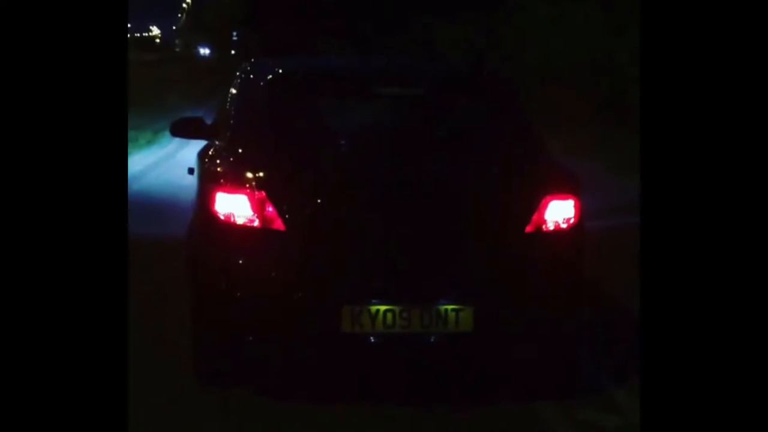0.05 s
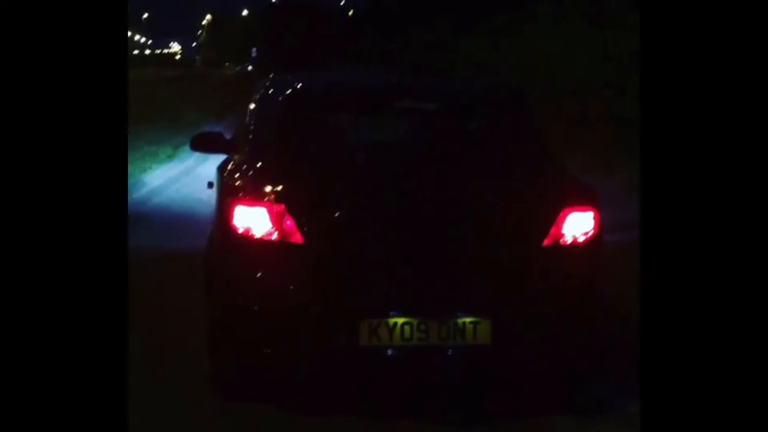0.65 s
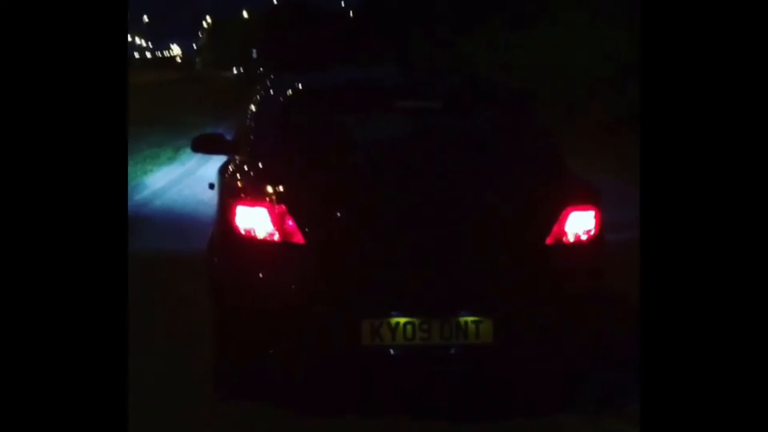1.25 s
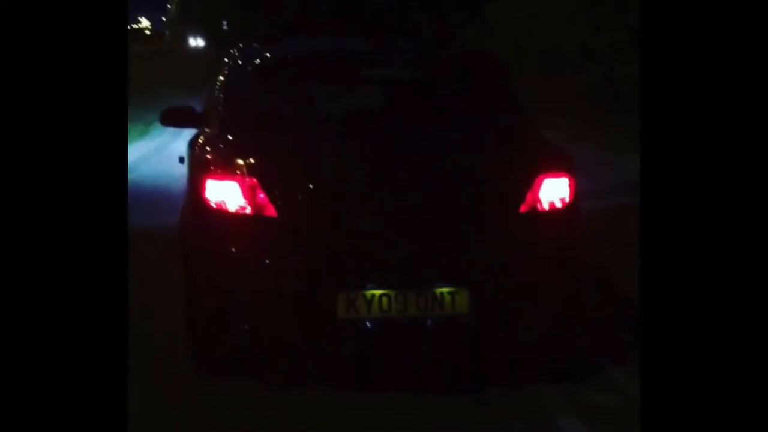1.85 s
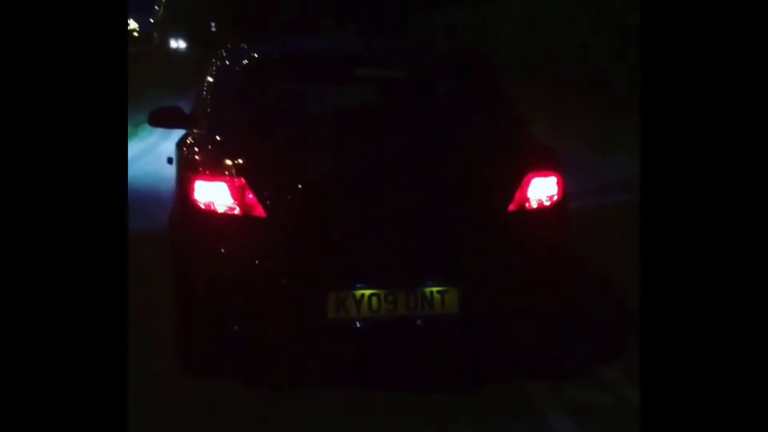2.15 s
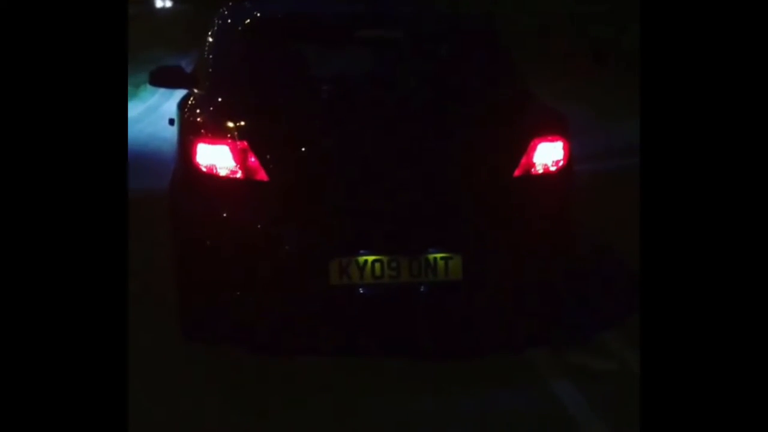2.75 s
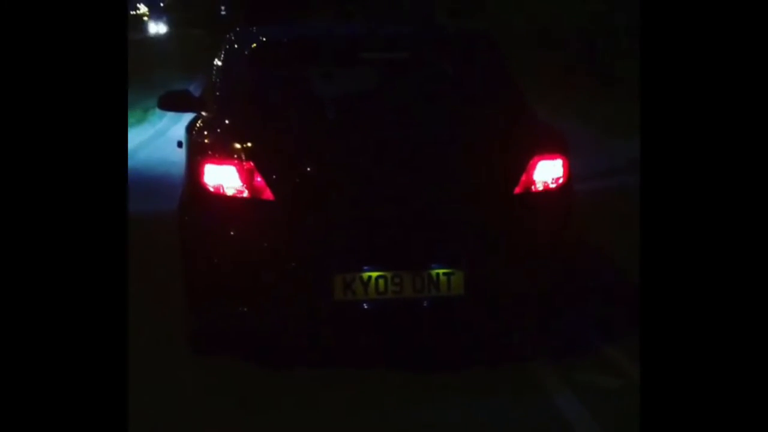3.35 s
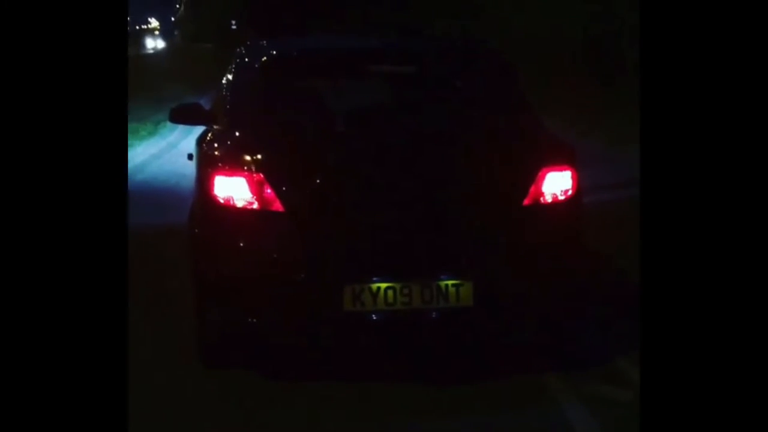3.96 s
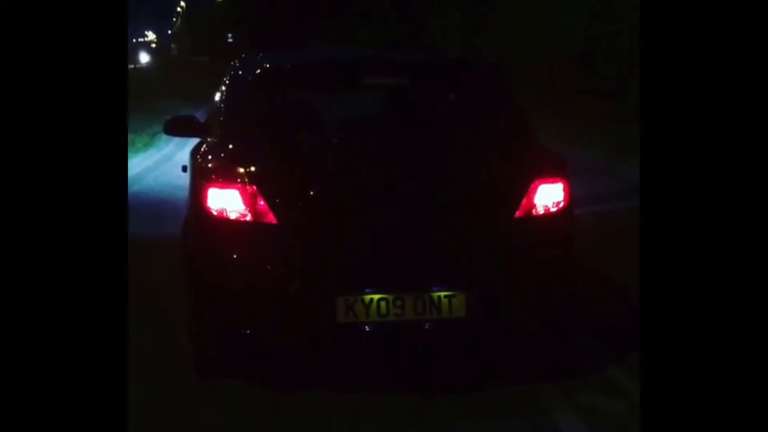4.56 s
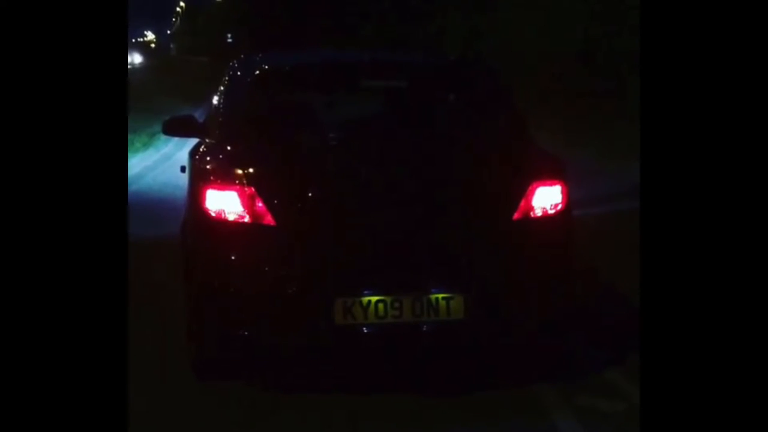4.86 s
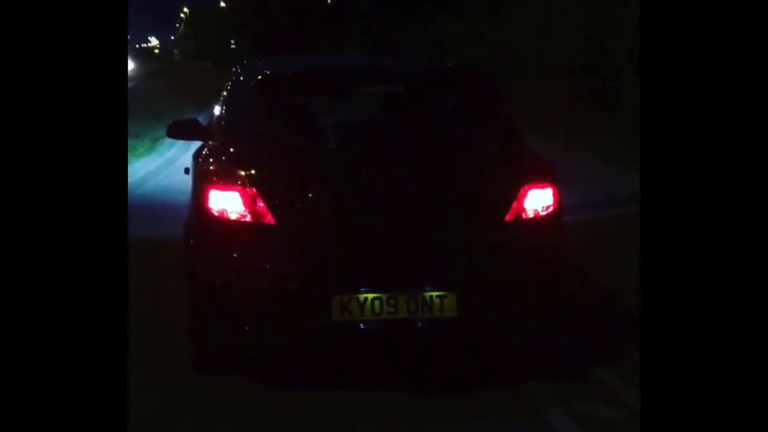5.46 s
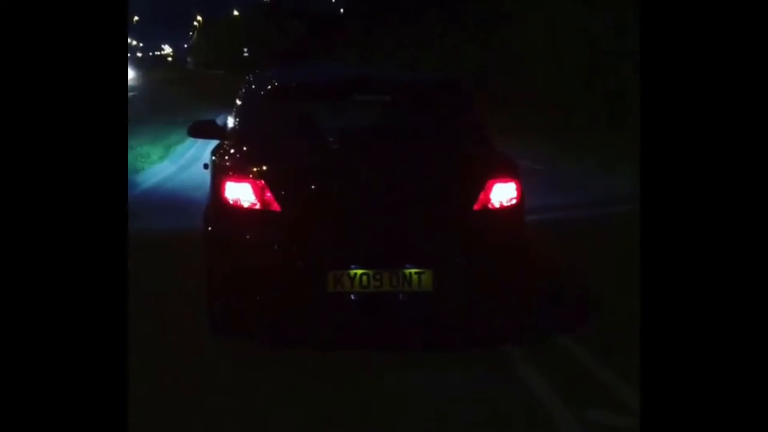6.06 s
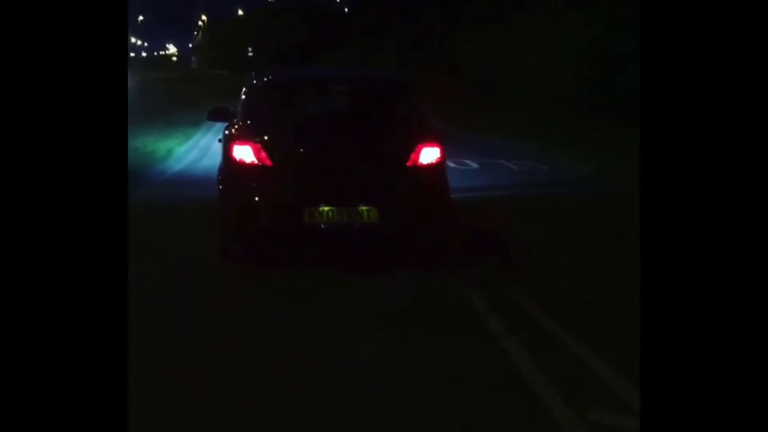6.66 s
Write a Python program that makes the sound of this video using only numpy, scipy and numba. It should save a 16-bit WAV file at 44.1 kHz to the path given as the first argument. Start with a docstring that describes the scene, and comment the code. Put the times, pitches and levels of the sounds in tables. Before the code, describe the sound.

A turbocharged four-cylinder car idles with a low, uneven putter, heard close behind the tailpipe on a quiet road at night. The engine pulls steadily up to high revs, with one faint brake squeak on the way. It then stutters against the rev limiter with thumps, exhaust pops and a thin turbo whistle. The revs dip, the note turns harsher, and a quick run of hard bangs ends it.

```python
"""The exhaust of a turbocharged four-cylinder car, heard just behind the tailpipe on a road at night.
A pulse train, one pulse per firing, drives the resonances of pipe and silencer. The engine idles, pulls
against the brakes (one squeak) and bounces on its rev limiter while the turbo whistles. Each cut drops
the revs and leaves unburnt fuel in the pipe, which pops as firing resumes. Boost steepens the waves and
hardens the note; the engine bogs as the car moves off, and it ends in hard bangs."""
import sys
import numpy as np
from scipy import signal
from scipy.fft import rfft, irfft
from scipy.io import wavfile
from scipy.ndimage import uniform_filter1d
from numba import njit

SR = 44100
rng = np.random.default_rng(int(sys.argv[2]) if len(sys.argv) > 2 else 0)


def to_wav(sig):
    """Store sig (one row per channel, or 1-D mono) as 16-bit WAV at the path in sys.argv[1].

    Samples outside -1..1 are clipped; the rate is SR.
    """
    pcm = np.clip(np.atleast_2d(sig), -1, 1) * 32767
    pcm = np.round(pcm).astype(np.int16)
    wavfile.write(sys.argv[1], SR, pcm.T)  # frames by channels


N = 296352
TIME = np.arange(N) / SR
IDLE_HZ, LIMIT_HZ, LAST_LIMIT_HZ = 26, 144.9, 142.5  # firing rates

# Levels in the tables are relative: each source applies its own further gains.
# engine speed up to the limiter (time [s], firing rate [Hz])
FIRING_RATE = [(0.0, 26.27), (0.29, 26.3), (0.49, 25.86), (0.78, 27.2), (1.04, 29.37), (1.42, 30.09),
               (1.54, 32.34), (1.83, 44.7), (1.99, 51.4), (2.15, 57.7), (2.31, 64.36), (2.83, 82.35),
               (3.25, 96.5), (3.35, 103.4), (3.44, 107.2), (3.55, 122.7), (3.66, 130.5)]
# load on the engine (time [s], boom level [dB], drone level [dB])
LOAD = [(0, -22, -25), (.5, -25, -25), (.88, -20, -22.5), (1.13, -16, -19), (1.4, -27.5, -22.5),
        (1.52, -19, -17.5), (1.68, -20, -24), (1.86, -13.5, -18), (2.0, -18.5, -19.5), (2.17, -13.5, -21),
        (2.44, -15, -15), (2.58, -18.5, -21.5), (2.95, -19, -20.5), (3.17, -19, -18.5), (3.36, -16.5, -21),
        (3.48, -21, -13), (3.58, -25, -26.5), (4.1, -25, -19.5), (5.4, -23, -21), (6.2, -22.5, -18.5),
        (6.6, -24, -24.5)]
# imbalance of the four cylinders, in firing order (level [dB])
CYLINDER_DB = [2.0, -.2, -1.4, -.4]
# irregularity of firing (time [s], lumpiness [0-1], strong-weak lope [dB])
UNEVENNESS = [(1.3, .42, 1), (1.8, .35, .3), (2.5, .3, .2), (2.8, .75, .2), (3.0, .7, .3), (3.15, .25, .5),
              (3.45, .2, .3), (3.75, 1, 0)]
# weak firings (time [s], half width [s], boom change [dB], drone change [dB])
STUMBLES = [(0.609, 0.028, -3.5, -14.5), (0.768, 0.014, -2.5, -7), (1.326, 0.018, -8, -17),
            (3.898, 0.059, -3.5, -5)]
# limiter cuts (start [s], end [s], boom change [dB], drone change [dB], rasp change [dB])
CUTS = [(3.776, 3.867, 4, -3, -1.5), (4.031, 4.11, 2.5, -4, -3), (4.201, 4.273, 2.5, -4, -1.5),
        (4.365, 4.432, 0, -4, -2.5), (4.51, 4.604, 0.5, -3, -1.5), (4.717, 4.791, 0, -3, -4),
        (4.909, 4.99, -2, -2.5, -3), (5.145, 5.206, -0.5, -7.5, -5.5), (5.351, 5.403, -1, -9.5, -7),
        (5.545, 5.609, -2.5, -8.5, -9), (5.756, 5.823, -4.5, -7, -11), (5.938, 6.009, -6, -8.5, -10),
        (6.401, 6.466, -12.5, -30, -4), (6.571, 6.637, -18, -36, -3.5)]
CUT_BOOM_DB, CUT_DRONE_DB, CUT_RASP_DB = np.transpose(CUTS)[2:]
# hardening of the note by boost (time [s], extra rasp [dB])
BOOST = [(1.7, -2), (1.9, -0.5), (2.01, 0), (2.12, 2), (2.24, 1), (2.39, 1.5), (2.58, -2), (3.1, 1),
         (3.44, -0.5), (3.54, -3), (4.8, -2.5), (5.4, 0.5), (6.05, 0.5), (6.2, 8), (6.245, 4), (6.3, 8),
         (6.55, 4)]

# resonances (frequency [Hz], bandwidth [Hz], gain [dB])
PIPE_MODES = [(55.3, 4, 16), (88.2, 15.7, 6), (131.6, 28, 2.5), (183, 17.8, 2)]
SILENCER_MODES = [(190, 31, -27.5), (272.77, 25, 18), (309, 22.3, 17.5), (331.4, 38.6, 14),
                  (411.6, 70, -0.5)]
SILENCER_IDLE_MODES = [(264.5, 17.3, 5), (284.6, 28.1, 0.5), (344.5, 38, -16)]
CHAMBER_MODES = [(312.3, 20, -0.5), (338, 28, -1.5), (370.6, 33, -7), (407.8, 19.6, -5.5)]
TAILPIPE_MODES = [(448, 22, 4), (648.5, 59, 7), (1032, 180, -1), (1116, 146, 2), (1570, 490, -10.5),
                  (2010, 350, -13)]
MOUTH_MODES = [(689, 75, 1.5), (920, 96, -2.5), (948, 37, 1), (1025, 81, -4.5), (1720, 280, -22.5)]
VALVE_GEAR_MODES = [(2700, 140, -1), (3200, 280, -6.5), (3980, 1600, -14.5)]

# the silencer's passband widens as the gas heats up (time [s], upper edge [Hz])
SILENCER_EDGE = [(1.9, 295.5), (2.45, 311.4), (2.9, 343), (3.25, 334), (3.5, 391), (4.5, 395.4), (5.4, 416),
                 (6.6, 468.8)]
# burble of the silencer's upper chambers (time [s], level [dB])
BURBLE_LEVEL = [(3.4, -65), (3.6, -23.5), (4.3, -26.5), (5.4, -19.5), (6.1, -24), (6.7, -20)]
# bark of the pipe mouth under boost (time [s], level [dB])
BARK_LEVEL = [(3.7, -58), (4.9, -44.5), (5.45, -39.5), (5.7, -36), (6.08, -42), (6.2, -31), (6.26, -30.5),
              (6.36, -30), (6.53, -25.5), (6.72, -29.5)]
# snarls as the boost arrives and as the clutch bites (time [s], half width [s], level [dB])
SNARLS = [(3.425, 0.069, -9), (6.201, 0.033, -2.5)]
# their harmonics (multiple of the firing rate [-], level [dB])
SNARL_PARTIALS = [(3, -7.5), (4, -19.5), (6, -20.5), (7, -32), (8, -31.5), (9, -33.5)]
# rushes of gas as the load comes on (time [s], half width [s], extra hiss [dB])
RUSHES = [(2.161, 0.12, 19), (6.32, 0.15, 5.5)]
# fuel exploding in the pipe
# (time [s], bang [dB], sizzle [dB], sizzle time constant [s], crack [dB], crack sweep span [Hz])
POPS = [(4.112, -38, -48.5, 0.0079, -31, 1512), (4.272, -44, -51, 0.0068, -33.5, 1780),
        (4.793, -52, -47, .008, -40, 1980), (4.996, -34.5, -53, 0.0069, -29, 1510),
        (5.208, -31.5, -39.5, 0.0069, -23, 2480), (5.404, -25.5, -41, 0.01, -26, 1880),
        (5.612, -37, -42.5, 0.009, -24, 1520), (5.825, -30.5, -47.5, 0.007, -24.5, 1399),
        (6.009, -34, -50, 0.0077, -31, 2202), (6.383, -23.5, -64, 0.0081, -11, 1870),
        (6.469, -20, -44, 0.014, -8.5, 3500), (6.555, -22.5, -62, 0.0058, -20, 899),
        (6.641, -20.5, -46, 0.016, -11, 1760)]
# compressor whistle before the cuts slow it (time [s], frequency [Hz], level [dB])
TURBO_WHISTLE = [(3.42, 4298, -73), (3.66, 5380, -59), (3.78, 5900, -69), (3.9, 5750, -69),
                 (4.0, 5600, -58.5), (4.2, 6000, -58), (4.38, 6200, -64), (4.5, 6100, -57),
                 (4.6, 6150, -59), (4.72, 6150, -56), (4.87, 6350, -62), (5.1, 6680, -61), (5.2, 7100, -85),
                 (5.34, 7700, -66), (5.52, 8000, -72.5), (5.74, 8720, -63), (5.93, 9050, -69),
                 (6.08, 9050, -68), (6.2, 9250, -68)]
# rattle of the valve gear (time [s], level [dB])
VALVE_GEAR_LEVEL = [(0, -75), (.6, -69), (1.5, -79.5), (1.85, -64.5), (2.35, -60.5), (3.3, -61.5),
                    (4.5, -58.5), (5.6, -65)]
# tones of the belt drive (multiple of the firing rate [-])
BELT_ORDERS = [19.2, 22.6]
# strength of each belt tone (level [dB])
BELT_DB = [-61.5, -60]
# brake squeak (time [s], level [dB])
SQUEAK_LEVEL = [(2.96, -100), (2.975, -59), (3.0, -57), (3.04, -60), (3.09, -64), (3.15, -91)]
# its harmonics (multiple of the fundamental [-], level [dB])
SQUEAK_PARTIALS = [(1, -18), (2, -1), (3, 1.5), (4, -9), (5, -6.5), (6, -17)]

# noise spectra (frequency [Hz], spectral level [dB])
JET_SPECTRUM = [(1500, -5), (2200, 2.5), (2900, -5), (3320, -7), (4000, -9), (5000, -11), (6400, -10),
                (7600, -17), (10000, -18.5), (12500, -22), (15000, -28.5)]
CLATTER_SPECTRUM = [(350, -13), (520, -9.5), (700, -9.5), (1000, 0), (1250, -7.5), (1600, -10.5),
                    (2300, -17), (3000, -31), (4200, -37.5), (9000, -41.5)]
FLAME_SPECTRUM = [(60, -41), (250, -15.5), (500, 1.5), (650, 13), (790, 5.5), (1000, 8), (1350, -6.5),
                  (1900, -5), (3000, -17.5), (5000, -48), (12000, -66)]
SIZZLE_SPECTRUM = [(800, -25.5), (2200, .5), (4000, 0), (6500, -.5), (9000, -6), (15000, -13)]
RUMBLE_SPECTRUM = [(8, -17), (20, -7), (45, -10.5), (100, -9.5), (400, -48), (2000, -75.5)]
RUSTLE_SPECTRUM = [(300, -8.5), (1000, 1), (2300, -7.5), (4000, -28), (9000, -35.5)]
TICK_SPECTRUM = [(1000, -29), (3000, 7), (6500, 0), (10000, -18)]


def firings(phase, scatter, jitter, uneven):
    """Impulse excitation: each opening exhaust valve gives one pulse, irregular in time and strength."""
    count = np.arange(1, int(phase[-1]))
    timing_draw, level_draw = rng.standard_normal((len(count), 2)).T
    firing_s = np.interp(count, phase, TIME)
    times, *columns = np.transpose(UNEVENNESS)
    lumpiness, lope_db = (np.interp(firing_s, times, column) for column in columns)
    imbalance = uneven * np.array(CYLINDER_DB)[count % len(CYLINDER_DB)]
    late_turns = lumpiness * (jitter * timing_draw - .011 * imbalance)
    onsets = np.interp(count + late_turns, phase, np.arange(N)).astype(int)
    db = lumpiness * (imbalance + scatter * level_draw) - uneven * lope_db * (-1.) ** count
    return np.bincount(onsets, undb(db), N)


def pipe_boom(phase, hz, db, deep_loss_db=-11):
    """Standing waves: the pulses drive the long modes of the pipe, and fast flow damps the deepest."""
    pulses = firings(phase, scatter=.8, jitter=.009, uneven=.5)
    softness = np.interp(hz, [27, 31], [.9, 0])  # broad idle pulses favour the deepest mode
    pulses = softness * smooth(pulses, .0025) + (1 - softness) * pulses
    loss = 1 - undb(deep_loss_db * np.interp(hz, [85, 115], [0, 1]))

    def pipe(x):
        modes = ring(x, PIPE_MODES) - loss * ring(x, PIPE_MODES[:1])
        return bandpass(modes, 58, 530, orders=(4, 4))

    # an unfired cylinder sucks instead of blowing, so the pulses invert in a cut
    gate = cut_gate(CUT_BOOM_DB, edge_s=.0011, factor=-1.61) * afterburn(kick=10)
    return pipe(pulses * gate) / running_rms(pipe(pulses)) * undb(db)


def silencer_drone(phase, hz, db, lag_turns=.298):
    """Cavity resonance: the silencer rings near one note, a round putter at idle, brighter at speed."""
    puffs = firings(phase, scatter=3, jitter=.006, uneven=.7)
    putter = bandpass(ring(puffs, SILENCER_IDLE_MODES), 232, 345, orders=(3, 3))
    # under load the silencer answers part of a cycle later than the pipe
    pulses = firings(phase - lag_turns, scatter=2.6, jitter=.018, uneven=1.7)
    drone = butter(ring(pulses, SILENCER_MODES), 237, "high", order=4)
    edge_hz, = curves(SILENCER_EDGE)
    for damping in 2 * np.sin(np.pi * np.array([1, 3, 5, 7]) / 16):  # eighth-order Butterworth
        drone = moving_lowpass(drone, edge_hz, damping)
    idle_share = np.interp(hz, [44, 56], [1, 0])
    note = idle_share * levelled(putter) + (1 - idle_share) * levelled(drone)
    return levelled(note) * afterburn(kick=3.7) * undb(db) * cut_gate(CUT_DRONE_DB, edge_s=.0018)


def silencer_swell(hz, note_hz=285.3, half_width_hz=24.4, peak_db=8):
    """Forced resonance: the gain in dB as the nearest harmonic crosses the silencer's note."""
    detuning_hz = note_hz - hz * np.round(note_hz / hz)
    resolved = np.interp(hz, [31, 45], [0, 1])  # idle harmonics lie too close to stand out
    return peak_db * resolved / (1 + (detuning_hz / half_width_hz) ** 2)


def snarl(phase):
    """Harmonic series: upper multiples of the firing rate swell briefly under the hardest load."""
    tone = sum(undb(db) * np.sin(2 * np.pi * k * phase) for k, db in SNARL_PARTIALS)
    return tone * sum(undb(db) * bump(s, width) for s, width, db in SNARLS)


def steepening(wave, hz, boost_db):
    """Nonlinear propagation: strong waves steepen in the pipe, more so with boost and fast flow."""
    overtones = butter(ring(wave ** 2 + 2 * wave ** 3, TAILPIPE_MODES), 320, "high", order=5)
    flow_db = np.interp(hz, [65, 105], [-23, -16])
    return overtones * undb(flow_db + .7 * boost_db)


def chamber_burble(phase):
    """Sidebands: unequal cylinders ring the silencer's upper chambers between the firing harmonics."""
    db, = curves(BURBLE_LEVEL)
    pulses = firings(phase, scatter=3, jitter=.02, uneven=3)
    chambers = butter(ring(pulses, CHAMBER_MODES), 274, "high", order=6)
    return levelled(chambers) * undb(db) * cut_gate(.63 * CUT_DRONE_DB, edge_s=.0033)


def mouth_bark(phase):
    """Shock excitation: under boost each firing leaves as a small shock and rings the pipe's mouth."""
    db, = curves(BARK_LEVEL)
    shocks = firings(phase, scatter=2, jitter=.004, uneven=1.1)
    mouth = bandpass(ring(shocks, MOUTH_MODES), 470, 2400, orders=(4, 2))
    gate = (TIME > BARK_LEVEL[0][0]) * cut_gate(4.8 * CUT_RASP_DB, edge_s=.0018)
    return levelled(mouth) * undb(db) * gate


def tailpipe_rasp(phase, hz, boost_db, rise_db_per_hz=.1242):
    """Broadband excitation: gas puffs and steep fronts ring the tailpipe; at idle, valves clatter."""
    puff = firing_decay(phase, turns=.99) + .84
    gas = unit(ring(puff * rng.standard_normal(N), TAILPIPE_MODES))
    pulses = firings(phase, scatter=1.2, jitter=.005, uneven=.9)
    fronts = butter(ring(pulses, TAILPIPE_MODES), 1300, "low")
    steepness = undb(-6.5 + .68 * boost_db)
    pipe = bandpass(gas + steepness * levelled(fronts), 520, 4900, orders=(3, 4))
    clatter = noise(CLATTER_SPECTRUM) * (1 + 3.3 * puff)
    pipe_share = np.interp(hz, [31, 101], [0, 1])
    mix = np.sqrt(pipe_share) * levelled(pipe) + np.sqrt(1 - pipe_share) * unit(clatter)
    db = -49.5 + rise_db_per_hz * (hz - IDLE_HZ) + boost_db
    return mix * undb(db) * cut_gate(CUT_RASP_DB, edge_s=.0017) * afterburn(kick=5.8)


def jet_hiss(phase, hz, boost_db, rise_db_per_hz=.2378):
    """Jet noise: the escaping gas throbs with the firings, flutters, and spits as the flow grows."""
    grain_db = np.interp(TIME, [3.4, 3.9], [1, 1.8]) * wander(.001)
    flutter_db = .9 * wander(.018)
    throb = 1 + .061 * np.cos(2 * np.pi * phase)
    jet = unit(noise(JET_SPECTRUM) * undb(grain_db + flutter_db) * throb)
    rush_db = sum(db * bump(s, width) for s, width, db in RUSHES)
    db = -76.5 + rise_db_per_hz * (hz - IDLE_HZ) - .18 * boost_db + rush_db
    return jet * undb(db) * cut_gate(.19 * CUT_RASP_DB, edge_s=.005)


def limiter_sag(fall_hz_per_s=215, recovery_s=.08):
    """First-order relaxation: the firing rate in Hz lost during each cut and regained after it."""
    cutting = sum((TIME > start) * (TIME < end) for start, end, *_ in CUTS)
    return signal.lfilter([fall_hz_per_s / SR], [1, -np.exp(-1 / (recovery_s * SR))], cutting)


def cut_gate(changes_db, edge_s, factor=1):
    """Amplitude modulation: gain 1 while firing; in each cut, its level change times the factor."""
    gate = np.ones(N)
    for (start, end, *_), db in zip(CUTS, changes_db):
        gate[int(start * SR):int(end * SR)] = factor * undb(db)
    return smooth(gate, edge_s)


def cut_thumps(thump_hz=78, bandwidth_hz=34):
    """Inertia: the gas column lurches one way when the flow stops and the other when it restarts."""
    lurch = np.zeros(N)
    for start, end, boom_db, *_ in CUTS:
        push = undb(35 + min(boom_db, 0))
        lurch[int(start * SR)], lurch[int(end * SR)] = -push, push
    return butter(ring(lurch, [(thump_hz, bandwidth_hz, 0)]), 310, "low", order=4)


def fuel_pops(phase, flare_s=.0011, decay_s=.018, grain_db=5):
    """Combustion noise: exploding fuel gives a crack, a burst of flame, a thud and a brief sizzle."""
    cracks, blows, flame, sizzle = np.zeros((4, N))
    for s, bang_db, sizzle_db, sizzle_s, crack_db, span_hz in POPS:
        age, onset = np.maximum(TIME - s, 0), int(s * SR)
        front = shock_crack(span_hz)[:N - onset]
        cracks[onset:onset + len(front)] += undb(crack_db) * front
        blows[onset] = undb(bang_db)
        flame += undb(bang_db) * np.minimum(age / flare_s, 1) * np.exp(-age / decay_s)
        sizzle += undb(sizzle_db) * (age > 0) * np.exp(-np.abs(age / sizzle_s - .8))
    # the flame leaves in puffs, one per firing, and a cut weakens it
    puffs = unit(.47 + firing_decay(phase, turns=.49))
    burst = flame * puffs * cut_gate(1.2 * CUT_RASP_DB, edge_s=.001) * noise(FLAME_SPECTRUM)
    grain = unit(undb(grain_db * wander(.0004)))
    crackle = sizzle * grain * noise(SIZZLE_SPECTRUM)
    thud = butter(ring(blows, SILENCER_MODES), 600, "low") * undb(38)
    return burst + butter(cracks, 110, "high") - thud + crackle


def shock_crack(span_hz, end_hz=330, sweep_s=.001, attack_s=.0044, decay_s=.0045):
    """Chirp and echo: the highs of a shock front arrive first, and it returns once, weaker."""
    echo_s, echo_db = .0069, -9
    age = TIME[:SR // 20]
    hz = end_hz + span_hz * np.exp(-age / sweep_s)
    envelope = (1 - np.exp(-age / attack_s)) * np.exp(-age / decay_s)
    front = np.sin(2 * np.pi * np.cumsum(hz) / SR) * envelope
    front /= np.abs(front).max()
    return front + undb(echo_db) * np.interp(age - echo_s, age, front)


def afterburn(kick, decay_s=.022):
    """Heat release: burning fuel strengthens the first few pulses after each pop."""
    flare = sum(undb(db / 2) * (TIME > s) * np.exp(-np.abs(TIME - s) / decay_s) for s, db, *_ in POPS)
    return 1 + kick * smooth(flare, .0015)


def turbo_whistle(sag_hz, flutter=.018, flicker_db=3):
    """Rotor tone: the compressor's thin, unsteady whistle drops with the engine speed in each cut."""
    hz, db = curves(TURBO_WHISTLE)
    hz = hz * (1 - .6 * sag_hz / LIMIT_HZ) * (1 + flutter * wander(.00075))
    db = db - 4 + flicker_db * wander(.01)
    return np.sqrt(2) * np.sin(2 * np.pi * np.cumsum(hz) / SR) * undb(db) * during(TURBO_WHISTLE)


def valve_gear(phase):
    """Impact noise: chain and tappets rattle their resonances once per firing."""
    db, = curves(VALVE_GEAR_LEVEL)
    ticks = (.5 + firing_decay(phase, turns=.42)) * rng.standard_normal(N)
    return unit(bandpass(ring(ticks, VALVE_GEAR_MODES), 2000, 4800, orders=(2, 4))) * undb(db)


def belt_whine(phase, hz, flicker_db=2.5, fade_from_s=4.5, fade_db_per_s=12):
    """Rotational orders: belt-driven parts whine at set multiples of a high firing rate, then fade."""
    tone = sum(undb(db) * np.sin(2 * np.pi * order * phase) for order, db in zip(BELT_ORDERS, BELT_DB))
    db = flicker_db * wander(.023) - fade_db_per_s * np.maximum(TIME - fade_from_s, 0)
    return np.sqrt(2) * tone * np.interp(hz, [120, 138], [0, 1]) * undb(db)


def brake_squeak(start_hz=1230, rise_hz_per_s=80, waver=.00084):
    """Friction-excited vibration: a pad slips briefly on its disc and sounds a harmonic tone."""
    db, = curves(SQUEAK_LEVEL)
    hz = (start_hz + rise_hz_per_s * (TIME - SQUEAK_LEVEL[0][0])) * (1 + waver * wander(.011))
    angle = 2 * np.pi * np.cumsum(hz) / SR
    tone = sum(undb(partial_db) * np.sin(k * angle) for k, partial_db in SQUEAK_PARTIALS)
    return np.sqrt(2) * tone * undb(db) * during(SQUEAK_LEVEL)


def roadside(x, t60_s=.078, delay_s=.015, wet_db=-24):
    """Scattering: hedges and verge add a faint, dull tail to the direct sound."""
    age = TIME[:SR]
    tail = bandpass(rng.standard_normal(SR) * undb(-60 * age / t60_s) * (age > delay_s), 310, 1300)
    tail /= np.sqrt(np.sum(tail ** 2))
    return x + undb(wet_db) * signal.fftconvolve(x, tail)[:N]


def night_air(rustle_decay_s=1, tick_s=.275, tick_decay_s=.016):
    """Ambient noise: a rumble of moving air, a soft rustle that dies away, and one light tick."""
    rumble = noise(RUMBLE_SPECTRUM) * undb(-49)
    rustle = noise(RUSTLE_SPECTRUM) * undb(-51) * np.exp(-TIME / rustle_decay_s)
    tick_envelope = (TIME > tick_s) * np.exp(-np.abs(TIME - tick_s) / tick_decay_s)
    return rumble + rustle + noise(TICK_SPECTRUM) * undb(-57) * tick_envelope


def undb(db):
    """Decibels to amplitude ratio."""
    return 10 ** (np.asarray(db) / 20)


def curves(table):
    """Linear interpolation of each column over time."""
    times, *columns = np.transpose(table)
    return [np.interp(TIME, times, column) for column in columns]


def during(table):
    """Rectangular window from a table's first time to its last."""
    return (TIME > table[0][0]) * (TIME < table[-1][0])


def bump(s, half_width_s):
    """Gaussian window of height 1."""
    return np.exp(-((TIME - s) / half_width_s) ** 2)


def firing_decay(phase, turns):
    """Exponential decay that restarts at each firing."""
    return np.exp(-(phase % 1) / turns)


def unit(x):
    """Normalisation to rms 1."""
    return x / np.sqrt(np.mean(x ** 2))


def smooth(x, seconds):
    """Triangular running mean."""
    size = max(int(seconds * SR), 1)
    return uniform_filter1d(uniform_filter1d(x, size), size)


def running_rms(x):
    """Short-time rms amplitude."""
    return np.sqrt(np.abs(smooth(x ** 2, .075)) + 1e-14)


def levelled(x):
    """Normalisation by the short-time rms."""
    return x / running_rms(x)


def wander(seconds):
    """Random fluctuation of rms 1 on the given time scale."""
    return unit(smooth(rng.standard_normal(N), seconds))


def noise(spectrum):
    """Spectrally shaped noise of rms 1."""
    hz, db = np.transpose(spectrum)
    bin_hz = np.arange(N // 2 + 1) * SR / N
    gain = undb(np.interp(np.log(bin_hz + 1), np.log(hz), db))
    return unit(irfft(rfft(rng.standard_normal(N)) * gain, N))


def butter(x, hz, kind, order=2):
    """Butterworth high- or low-pass."""
    return signal.sosfilt(signal.butter(order, hz, kind, fs=SR, output="sos"), x)


def bandpass(x, low_hz, high_hz, orders=(2, 2)):
    """High-pass and low-pass in cascade."""
    return butter(butter(x, low_hz, "high", orders[0]), high_hz, "low", orders[1])


def ring(x, modes):
    """Modal superposition: parallel resonances, neighbours swinging in opposite senses."""
    return sum((-1) ** k * undb(db) * signal.lfilter(*signal.iirpeak(hz, hz / width, SR), x)
               for k, (hz, width, db) in enumerate(modes))


@njit
def moving_lowpass(x, hz, damping):
    """State-variable low-pass with a time-varying cutoff."""
    low, band_state, low_state = np.empty(len(x)), 0., 0.
    for i in range(len(x)):
        g = np.tan(np.pi * hz[i] / SR)
        band = (band_state + g * (x[i] + 1e-18 - low_state)) / (1 + g * (g + damping))
        low[i] = low_state + g * band
        band_state, low_state = 2 * band - band_state, low_state + 2 * g * band
    return low


def scene(bog_drop_hz=21.484, bog_boom_db=7):
    """Superposition: one firing phase drives the exhaust; speed, load and boost set the levels."""
    sag_hz = limiter_sag()
    bog = bump(6.195, .115)  # the clutch bites: revs drop and the pipe booms harder
    free_hz, = curves(list(FIRING_RATE) + [(CUTS[0][0], LIMIT_HZ), (TIME[-1], LAST_LIMIT_HZ)])
    hz = free_hz - sag_hz - bog_drop_hz * bog
    phase = np.cumsum(hz) / SR + .5  # one turn per firing
    stumble_db = sum(np.outer(changes, bump(s, width)) for s, width, *changes in STUMBLES)
    boom_db, drone_db = curves(LOAD) + stumble_db
    boost_db, = curves(BOOST)
    wave = pipe_boom(phase, hz, boom_db + bog_boom_db * bog)
    wave += silencer_drone(phase, hz, drone_db + silencer_swell(hz)) + snarl(phase)
    exhaust = wave + steepening(wave, hz, boost_db) + chamber_burble(phase) + mouth_bark(phase)
    exhaust += tailpipe_rasp(phase, hz, boost_db) + jet_hiss(phase, hz, boost_db)
    engine_bay = valve_gear(phase) + belt_whine(phase, hz) + turbo_whistle(sag_hz)
    car = exhaust + cut_thumps() + fuel_pops(phase) + engine_bay + brake_squeak()
    return (roadside(car) + night_air())[None]


def record(dry, knee=.9, top_hz=15300):
    """Soft saturation dully rounds the highest peaks, and a steep low-pass removes the top treble."""
    excess = dry - dry / (1 + (dry / knee) ** 10) ** (1 / 10)
    rounded = dry - smooth(excess, .00025)
    return signal.sosfilt(signal.ellip(8, .2, 70, top_hz, fs=SR, output="sos"), rounded)


dry = scene()
out = record(dry)
to_wav(out)
```